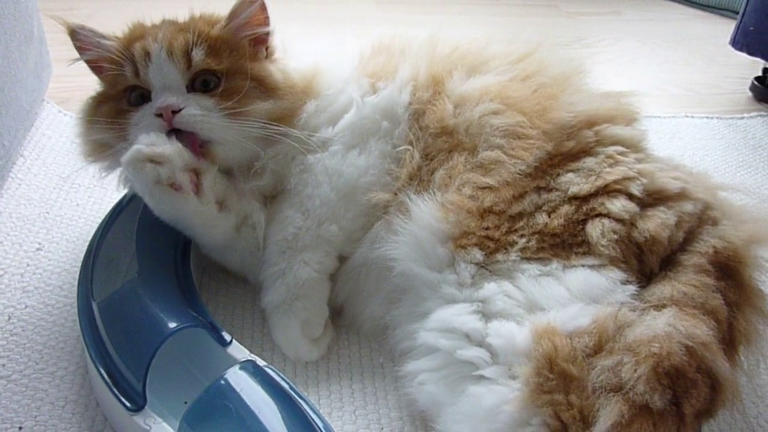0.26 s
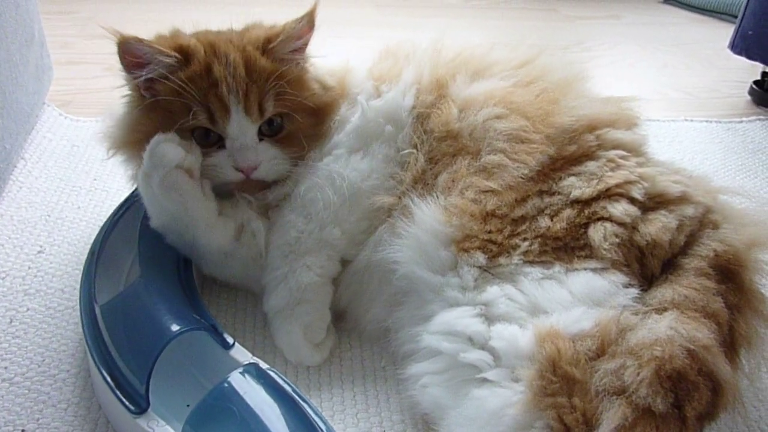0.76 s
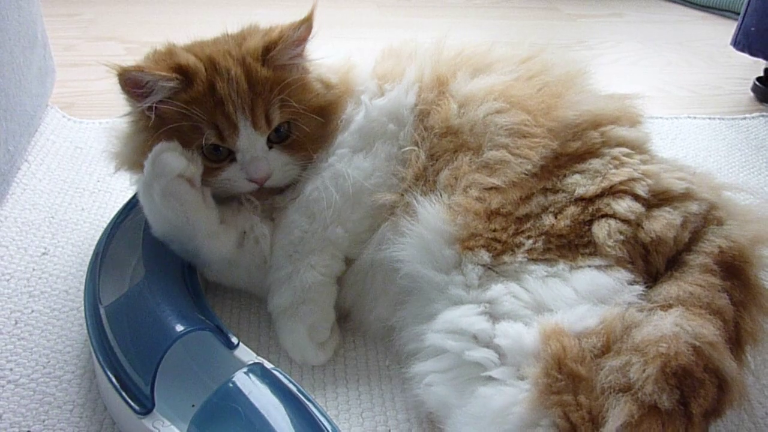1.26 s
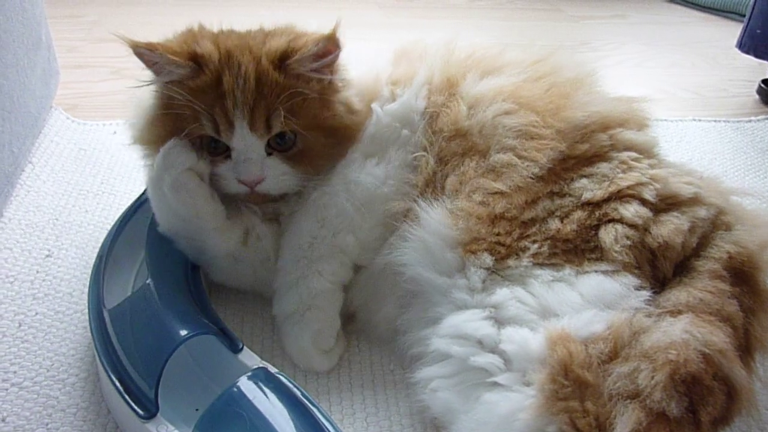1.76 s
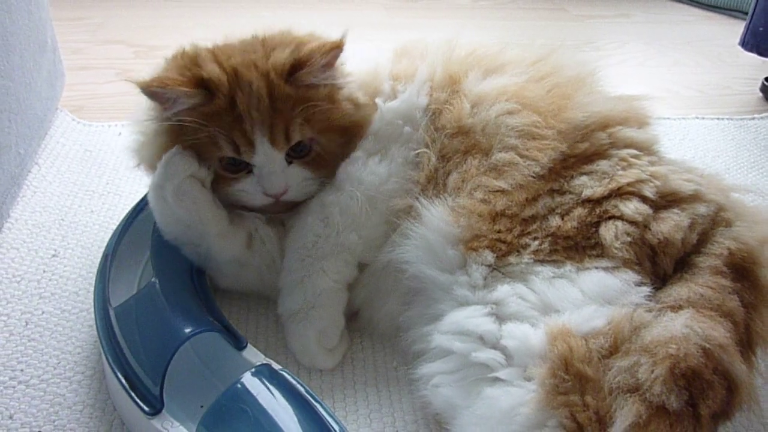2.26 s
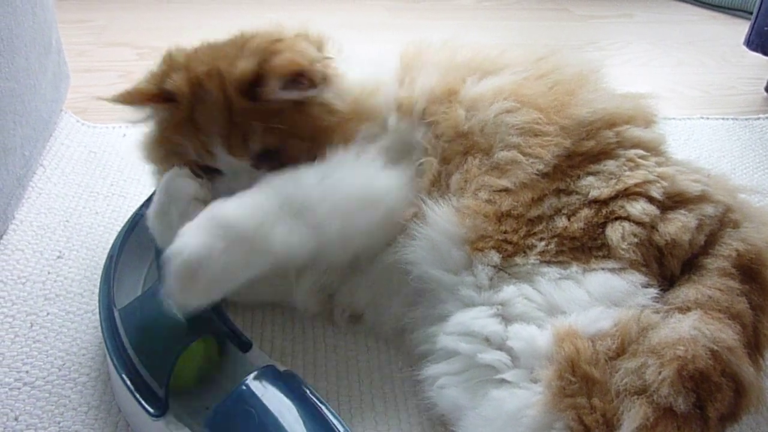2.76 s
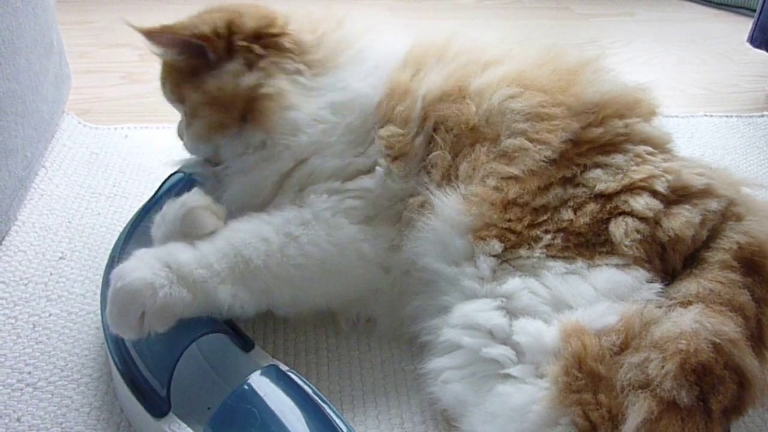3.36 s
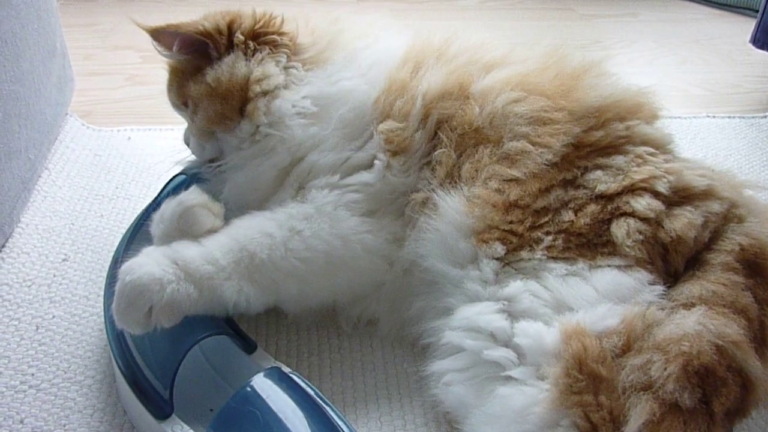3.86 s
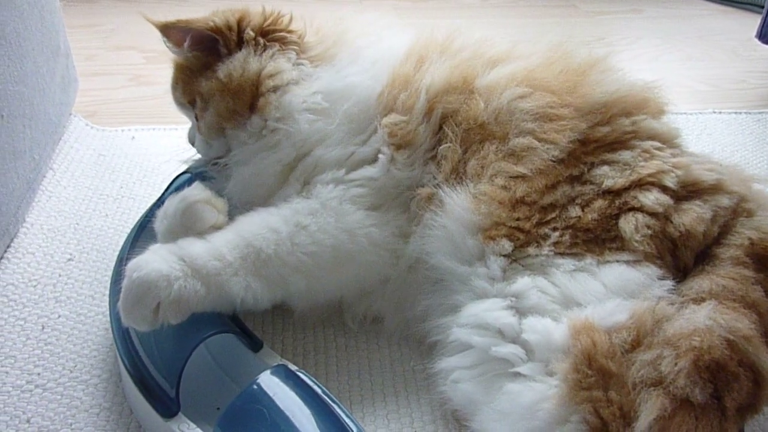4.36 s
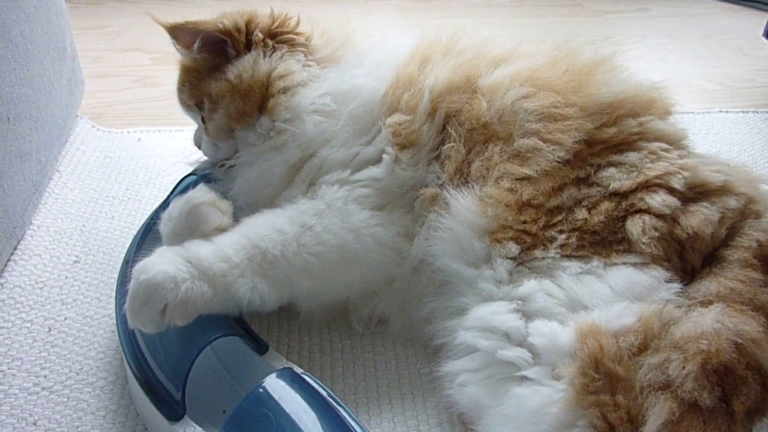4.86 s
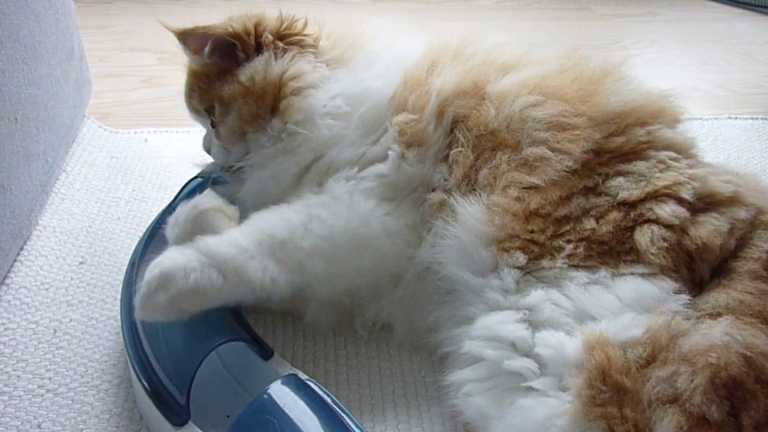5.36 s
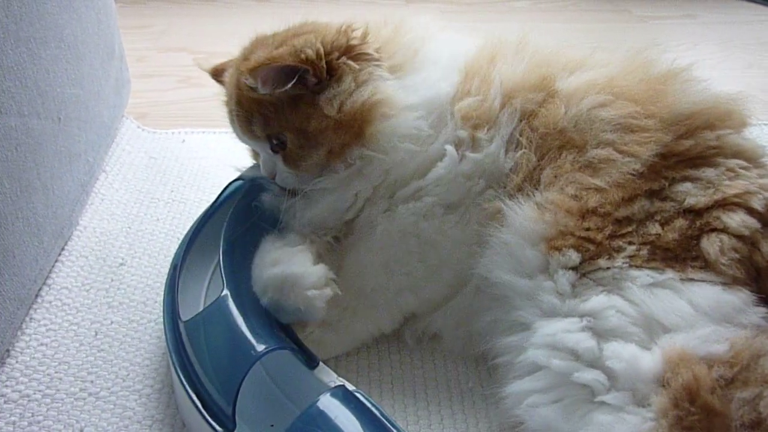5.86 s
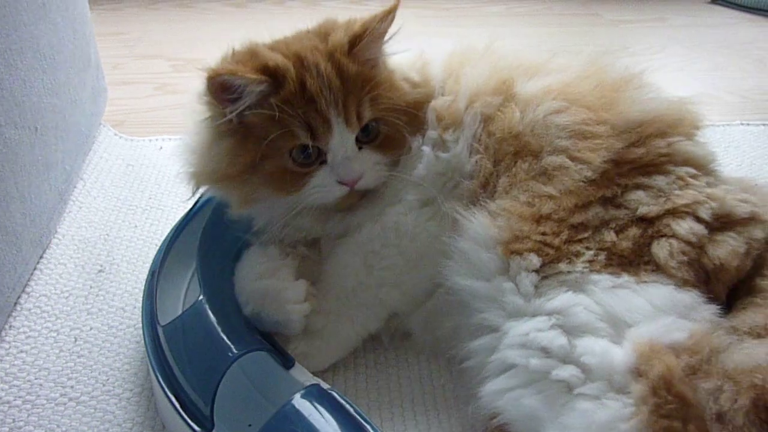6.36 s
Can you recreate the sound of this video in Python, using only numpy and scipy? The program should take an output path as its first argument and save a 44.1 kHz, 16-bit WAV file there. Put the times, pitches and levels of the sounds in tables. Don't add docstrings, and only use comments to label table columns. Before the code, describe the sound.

A hard ball rattles and knocks around a hollow plastic track in a quiet carpeted room, stops, then clatters again after a late second push.

```python
import sys
import numpy as np
from scipy import signal
from scipy.fft import rfft, irfft, next_fast_len
from scipy.io import wavfile
from scipy.ndimage import uniform_filter1d, map_coordinates

SR = 44100
rng = np.random.default_rng(int(sys.argv[2]) if len(sys.argv) > 2 else 0)


def generate_wav(sig):
    pcm = np.round(np.clip(np.atleast_2d(sig).T, -1, 1) * 32767).astype(np.int16)
    wavfile.write(sys.argv[1], SR, pcm)


def gain_from_db(level_db):
    decades = np.asarray(level_db, float) / 20
    return 10 ** decades


N = 291942


def unit(x):
    return x / np.sqrt(np.mean(x ** 2) + 1e-20)


def along(points, hz):
    f, v = np.transpose(points)
    return np.interp(np.log(hz + 1), np.log(f + 1), v)


def curves(spans, rest):
    t = np.arange(N) / SR
    out = np.outer(rest, np.ones(N))
    for rows in spans:
        times, *columns = np.transpose(rows)
        inside = (t >= times[0]) & (t <= times[-1])
        out[:, inside] = [np.interp(t[inside], times, column) for column in columns]
    return out


def wobble(rate):
    knots = rng.standard_normal(int(N * rate / SR) + 4)
    return map_coordinates(knots, [np.arange(N) * rate / SR])


def filtered(x, response):
    m = next_fast_len(N + SR // 2)
    return irfft(rfft(x, m) * response(np.fft.rfftfreq(m, 1 / SR)), m)[..., :N]


def body(modes):
    def response(f):
        total = 0
        for k, (centre, width, db) in enumerate(modes):
            damping = 1j * f * width
            total = total + (-1) ** k * gain_from_db(db) * damping / (centre * centre - f * f + damping)
        return total
    return response


def coloured(x, spectrum):
    return unit(filtered(x, lambda hz: gain_from_db(along(spectrum, hz))))


def bumps(per_second, spread_db):
    hit = rng.random(N) < per_second / SR
    size = gain_from_db(spread_db * np.clip(rng.standard_normal(N), -2, 2))
    return hit * size * rng.choice([-1, 1], N)


# (time [s], rolling level [dB], cavity pitch [Hz])
ROLL = [
    [(1.215, -63, 1160), (1.297, -36, 1180), (1.419, -31.5, 1150), (1.489, -35.5, 1180), (1.527, -35, 980),
     (1.667, -36.5, 880), (1.823, -33, 890), (2.1, -40, 765)],
    [(2.1, -41, 810), (2.426, -43.5, 1020), (2.466, -45, 954), (2.596, -44, 957), (2.918, -41, 716),
     (3.206, -44, 820), (3.352, -54, 915), (3.42, -57, 903)],
    [(5.89, -58.5, 1120), (5.974, -44, 1180), (6.092, -34, 960), (6.192, -38, 1000), (6.296, -35, 946),
     (6.332, -37, 1160), (6.392, -39, 1060), (6.62, -40.5, 1160)],
]
# (frequency [Hz], width [Hz], level [dB])
SHELL = [(166, 29, -0.5), (444, 51, -12.5), (720, 134, 9), (950, 390, -16.5), (1310, 320, 5.5),
         (1730, 740, -5), (2060, 660, -12)]
CAVITY_STEPS = (620, 780, 980, 1240, 1560)
# (time [s], half length [s], gain [dB], pitch [Hz])
BOOMS = [
    (1.457, 0.099, 8.5, 318),
    (2.45, 0.39, 10, 450),
    (5.99, 0.06, 12, 403),
]
# (frequency [Hz], level [dB per Hz])
SKID = [(500, -11), (1200, 12), (2500, -0.5), (3800, -4), (5500, -5.5), (7200, -11.5), (8000, -16)]


def rolling():
    level_db, cavity_hz = curves(ROLL, [-120, 912])
    moving = uniform_filter1d(1. * (level_db > -100), size=2400)

    drum_db = -49 + 0.34 * (level_db.clip(-70) + 43) + 2.8 * wobble(6.5)
    usual_hz = 380
    drum_hz = usual_hz * np.exp(.06 * wobble(5.96))
    for s, half, db, hz in BOOMS:
        shove = np.exp(-((np.arange(N) / SR - s) / half) ** 2)
        drum_db = drum_db + db * shove
        drum_hz = drum_hz + (hz - usual_hz) * shove

    def soft_touch(hz):
        return 1 / (1 + 1j * hz / 2400) ** 3 * (1j * hz / (90 + 1j * hz)) ** 2

    grit = bumps(1100, spread_db=3.5) * gain_from_db(1.6 * wobble(70))
    grit = filtered(grit, soft_touch)
    walls = unit(filtered(grit, body(SHELL)))
    cavity = hollow(grit, cavity_hz, CAVITY_STEPS, width=.14)
    drum = hollow(grit, drum_hz, (260, 340, 440, 560), width=.4)
    skid = coloured(bumps(5000, spread_db=4.5), SKID) * gain_from_db(1.6 * wobble(140))
    tube = 0.26 * walls + 0.55 * cavity
    return gain_from_db(level_db + 1) * tube + moving * gain_from_db(drum_db - 3.5) * drum + gain_from_db(skidding() + 12.0) * skid


def hollow(grit, pitch_hz, steps_hz, width):
    out = 0
    for hz in steps_hz:
        near = np.exp(-(np.log(pitch_hz / hz) / 0.2) ** 2)
        out = out + near * unit(filtered(grit, body([(hz, width * hz, 0)])))
    return out


# (time [s], hold [s], level [dB], change as it grips [dB])
SLIDE = [
    (1.226, 0.039, -46, -10.5),
    (5.899, .068, -45.5, -5),
]


def skidding():
    attack_s, grip_s, fade_s = 0.026, 0.022, 0.094
    spans = []
    for s, hold_s, db, grip_db in SLIDE:
        times = s + np.cumsum([0, attack_s, hold_s, grip_s, fade_s])
        levels = db + np.array([-22, 0, 0, grip_db, -22])
        spans.append(list(zip(times, levels)))
    return curves(spans, [-120])[0]


# (frequency [Hz], width [Hz], level [dB])
SNAP = [(3180, 1600, 5.5), (5170, 2200, 7), (6600, 360, -21)]


def knocks():
    out, blows, snaps = np.zeros((3, N + SR))
    t = np.arange(SR // 20) / SR

    def dying(t60, rise):
        return gain_from_db(-60 * t / t60) * (1 - np.exp(-t / rise))

    def damped(hz, t60, rise):
        return np.sin(2 * np.pi * hz * t) * dying(t60, rise)

    for s, db, hz, edge_db, click_db in contacts():
        z = rng.standard_normal(6).clip(-1.6, 1.6)
        noise = rng.standard_normal((2, len(t)))
        if db < -100:
            continue
        ring = damped(hz, 0.0098 * gain_from_db(1.3 * z[0]), 0.00069)
        ring = ring + .5 * damped(hz * (1.337 + 0.15 * z[1]), 0.013, 0.0019)
        lap = round((0.00438 + 0.00024 * z[2]) * SR)
        ring = ring + 0.14 * z[5] * np.roll(ring, lap)
        edge = damped(1850 + 130 * z[2], 0.0086, 0.0025) - 0.53 * damped(2350 + 130 * z[3], 0.0075, 0.001)
        edge = gain_from_db(edge_db + 0.5) * edge
        thud = gain_from_db(-23.5 + 0.97 * z[4]) * damped(400 + 70 * z[3], 0.015, 0.00083)
        click = noise[0] * (dying(0.0088, 0.00039) + .08 * dying(0.14, 0.00076))
        at = round((s - .0008) * SR)
        out[at:][:len(t)] -= gain_from_db(db + 8) * (ring + edge + thud)
        snaps[at:][:len(t)] += gain_from_db(db + click_db + 9.5) * click
        blows[at:][:len(t)] += gain_from_db(db) * noise[1] * dying(0.041, 0.00072)

    cavity_hz = curves(ROLL, [-120, 906])[1]
    soft = filtered(blows[:N], lambda hz: 1 / (1 + 1j * hz / 2500) ** 3)
    shell = unit(filtered(soft, body(SHELL)))
    rattle = gain_from_db(-48) * hollow(soft, cavity_hz, CAVITY_STEPS, width=0.24) + gain_from_db(-52) * shell
    direct = filtered(out[:N], lambda hz: (1j * hz / (120 + 1j * hz)) ** 2)
    return direct + rattle + filtered(snaps[:N], body(SNAP))


# (time [s], peak level [dB], ring [Hz], hardness [dB])
KNOCKS_OUT = [(1.3031, -26, 1310, -26), (1.3597, -25.5, 1260, -29), (1.3752, -23, 1260, -39),
              (1.4038, -16, 1340, -33), (1.4209, -21, 1250, -38), (1.4298, -17.5, 1370, -34),
              (1.4847, -16, 1310, -38.5), (1.4998, -16, 980, -19), (1.587, -28.5, 810, -19),
              (1.627, -22.5, 720, -29), (1.6371, -14.5, 1050, -28), (1.6471, -19.5, 960, -27.5),
              (1.6733, -19.5, 820, -30), (1.6924, -15, 730, -26), (1.7102, -14, 890, -26.5),
              (1.732, -19.5, 1210, -34.5), (1.7502, -21.5, 800, -31), (1.7786, -18.5, 930, -39.5),
              (1.8219, -21, 1120, -36), (1.8417, -21, 780, -37), (1.8546, -21, 767, -39),
              (1.9013, -21, 765, -32), (1.9078, -15.5, 1016, -33), (1.9262, -11, 810, -29.5),
              (1.9507, -19.5, 1040, -40.5), (1.9776, -22.5, 700, -41), (2.0212, -31.5, 720, -37),
              (2.0485, -20.5, 610, -31), (2.0613, -19.5, 700, -27.5), (2.0741, -16, 753, -44.5)]
# (time [s], peak level [dB], ring [Hz], hardness [dB])
KNOCKS_BACK = [(2.1357, -20.5, 550, -15), (2.1602, -20, 846, -23), (2.1885, -21.5, 885, -23.5),
               (2.2266, -29.5, 880, -26), (2.2611, -16.5, 874, -24.5), (2.279, -21.5, 1300, -39),
               (2.326, -26, 850, -37), (2.3697, -19.5, 960, -44.5), (2.3958, -12.5, 1194, -27.5),
               (2.4228, -22.5, 1240, -27), (2.4318, -19.5, 610, -31), (2.4845, -23, 950, -39),
               (2.5064, -27, 754, -20), (2.5243, -22, 1020, -29), (2.611, -19.5, 1046, -41),
               (2.6739, -26.5, 595, -23), (2.702, -22.5, 1000, -21), (2.713, -25.5, 950, -12.5),
               (2.7772, -22, 710, -32), (2.8079, -23.5, 915, -19.5), (2.824, -24, 720, -31),
               (2.856, -27.5, 920, -23), (2.8959, -24, 666, -22), (2.932, -28, 980, -39),
               (2.949, -23.5, 920, -33), (2.9924, -28, 660, -27), (3.0425, -22.5, 910, -26.5),
               (3.0706, -20, 720, -28), (3.212, -32, 810, -21.5), (3.3408, -25.5, 940, -20.5)]
# (time [s], peak level [dB], ring [Hz], hardness [dB])
KNOCKS_LATE = [(5.9443, -25.5, 645, -5.5), (5.985, -25, 1230, -11), (5.996, -15.5, 1150, -33),
               (6.012, -10.5, 1180, -31), (6.0609, -10.5, 970, -35.5), (6.097, -19, 845, -32),
               (6.1107, -27, 850, -25.5), (6.1601, -27.5, 960, -43), (6.1868, -21.5, 930, -33),
               (6.2355, -20, 994, -34), (6.245, -22.5, 1010, -20), (6.2921, -19.5, 1190, -26),
               (6.2967, -23, 1060, -28.5), (6.3412, -15.5, 1430, -11), (6.352, -11, 1170, -20),
               (6.3835, -10, 1180, -18.5), (6.395, -22.5, 1260, -15.5), (6.4156, -31, 1210, -14),
               (6.544, -26, 1280, -34), (6.5583, -25.5, 1220, -23), (6.571, -17, 1240, -30),
               (6.6122, -27.5, 1220, -23)]
# (time [s], peak level [dB], ring [Hz], edge [dB], click [dB])
TICKS = [
    (0.058, -42.5, 970, -6, -15),
    (0.868, -42, 495, -10, -8.5),
    (3.548, -43, 487, -8, -22),
    (3.699, -48.5, 471, -17, -17),
    (3.832, -45, 466, 7.5, -7),
    (5.143, -42, 456, -5, -15),
    (5.735, -48.5, 407, 6, -17),
    (5.828, -44.5, 570, -27, -14),
    (5.867, -40, 786, -3.5, -27),
]


def contacts():
    ball = [tuple(row) for row in KNOCKS_OUT + KNOCKS_BACK + KNOCKS_LATE] + chatter()
    luck = rng.standard_normal(len(ball)).clip(-2, 2)
    rows = []
    for (s, db, hz, hard_db), z in zip(ball, luck):
        since_push_s = s - max(push[0] for push in SLIDE if push[0] < s)
        edge_db = -7 + 0.54 * (hard_db + 23) - 4 * (since_push_s - .6) - 2 * z
        rows.append((s, db, hz, edge_db, hard_db))
    return rows + list(TICKS)


def chatter():
    per_second = 44
    laps_s = [(1.29, 3.36), (5.95, 6.33)]
    s = np.concatenate([np.arange(a, b, 1 / per_second) for a, b in laps_s])
    z = rng.standard_normal((len(s), 3)).clip(-2, 2)
    s = s + rng.random(len(s)) / per_second
    at = (s * SR).astype(int).clip(0, N - 1)
    level_db, cavity_hz = curves(ROLL, [-120, 900])[:, at]
    blows = np.array([row[0] for row in KNOCKS_OUT + KNOCKS_BACK + KNOCKS_LATE])
    after_s = s[:, None] - blows
    free = ~np.any((after_s < .006) & (-after_s < .014), axis=1)
    db = np.where(free, -33.5 + 0.21 * (level_db + 41.5) + 5.5 * z[:, 0], -120)
    return list(zip(s, db, cavity_hz * np.exp(.17 * z[:, 1]), -25 + 3 * z[:, 2]))


# (frequency [Hz], time to fall 60 dB [s])
ROOM = [(200, 0.9), (1000, 0.12), (3000, 0.25), (8000, 0.23)]


def room(x):
    hz, t, z = signal.stft(rng.standard_normal(SR // 2), SR, nperseg=256)
    decay = gain_from_db(-60 * t / along(ROOM, hz)[:, None])
    tail = signal.istft(z * decay, SR, nperseg=256)[1]
    return signal.fftconvolve(np.pad(x, (300, 0)), tail / np.linalg.norm(tail))[:N]


# (start [s], end [s], level [dB])
PURR = (0.445, 1.05, -52)
# (frequency [Hz], width [Hz], level [dB])
CHEST = [(159, 18, -1), (322, 49, -14), (480, 110, -21.5)]


def purr():
    start, end, db = PURR
    swell = [(start, db - 16), (start + 0.054, db), (end, db - 8), (end + 0.037, db - 18)]
    level_db, = curves([swell], [-120])
    turns = 26.8 * (np.arange(N) / SR - .477) + 0.013 * wobble(16.0)
    pulses = np.diff(np.floor(turns), prepend=0).clip(0, 1)
    pulses = pulses * gain_from_db(0.74 * rng.standard_normal(N))
    return gain_from_db(level_db + 2.8) * unit(filtered(pulses, body(CHEST)))


# (frequency [Hz], level [dB per Hz])
AIR = [(25, -32.5), (45, -25.5), (70, -15), (88, -15), (120, -9), (165, -5), (350, -12.5), (1000, -16.5),
       (2300, -22), (3600, -23.5), (6000, -24), (7300, -27), (8000, -32.5)]
# (time [s], level [dB])
HISS = [(0, -61.5), (5.1, -62.5), (5.5, -59.5), (6.62, -62)]
# (frequency [Hz], level [dB rms])
WHINE = [(7797, -98), (7857, -92.5), (7887, -95), (7917, -81), (7947, -99)]


def background():
    t = np.arange(N) / SR
    hiss_db, = curves([HISS], [-66])
    air = gain_from_db(hiss_db + 9.0 + 0.27 * wobble(1.7)) * coloured(rng.standard_normal(N), AIR)
    hum_hz = 100.2 + .9 * wobble(6)
    hum = gain_from_db(-56.5 + 1.3 * wobble(5)) * np.sin(2 * np.pi * np.cumsum(hum_hz) / SR)
    whine = sum(gain_from_db(db + 11.0) * np.sin(2 * np.pi * (hz * t + rng.random())) for hz, db in WHINE)
    return air + hum + whine


def scene():
    toy = rolling() + knocks()
    return (toy + gain_from_db(-16) * room(toy) + purr() + background())[None]


# (frequency [Hz], level [dB])
IMAGE = [(8000, 5), (8300, -12.5), (8600, -18), (8850, -29.5), (9050, -29), (9300, -60)]


def with_image(dry):
    camera_hz = 16000
    base = filtered(dry, lambda hz: hz < camera_hz / 2)
    mirror = 2 * base * np.cos(2 * np.pi * camera_hz * np.arange(N) / SR)
    return base + filtered(mirror, lambda hz: gain_from_db(along(IMAGE, hz)) * (hz > camera_hz / 2))


# (frequency [Hz], width [Hz])
NOTCHES = [(3004, 940), (4403, 1090), (8000, 630)]


def notch(f):
    out = 1
    for centre, width in NOTCHES:
        gap = centre * centre - f * f
        out = out * (gap + .04j * f * width) / (gap + 1j * f * width)
    return out


def band_limit(x):
    return signal.sosfilt(signal.butter(12, 8860, fs=SR, output="sos"), x)


def record(dry):
    mix = filtered(with_image(dry), notch) - .0343
    return band_limit(mix)


dry = scene()
out = record(dry)
generate_wav(out)
```